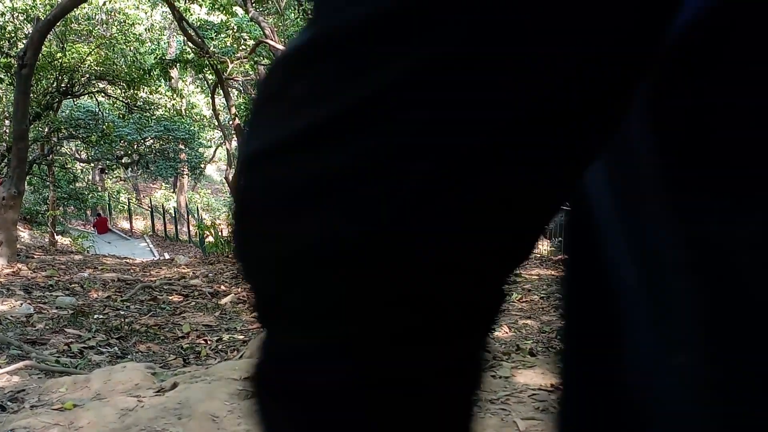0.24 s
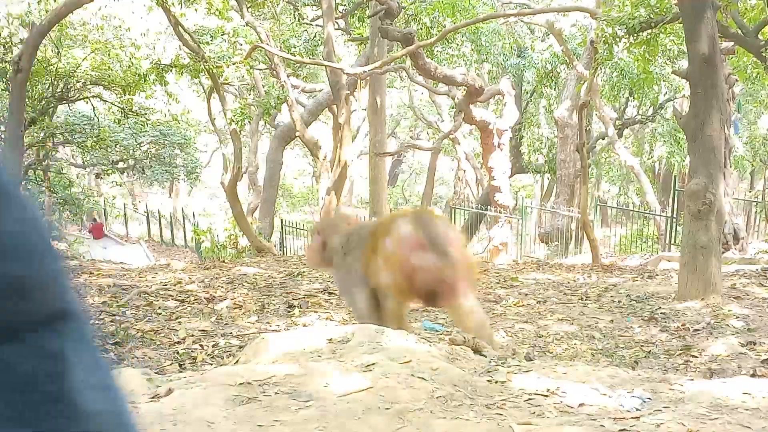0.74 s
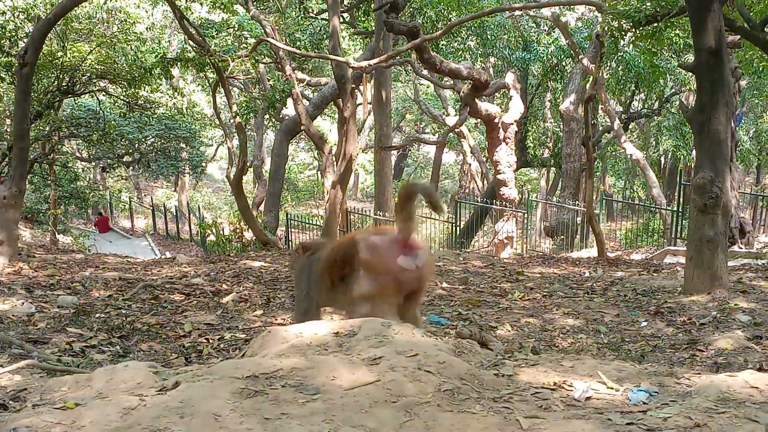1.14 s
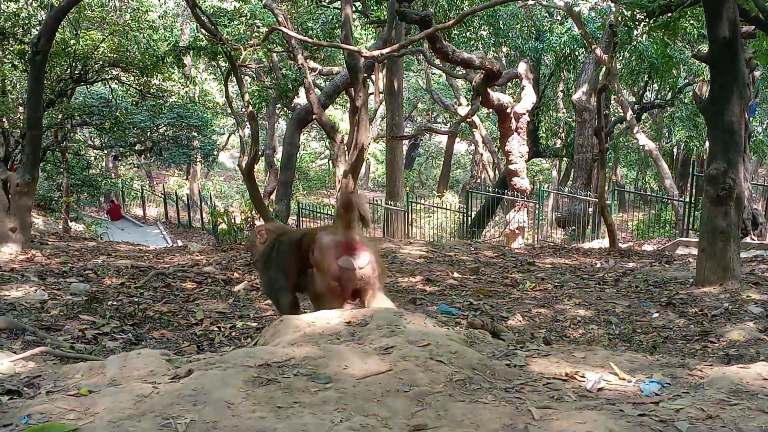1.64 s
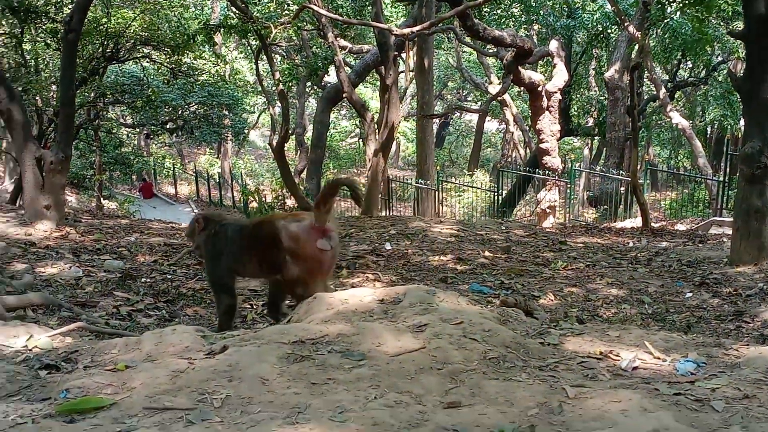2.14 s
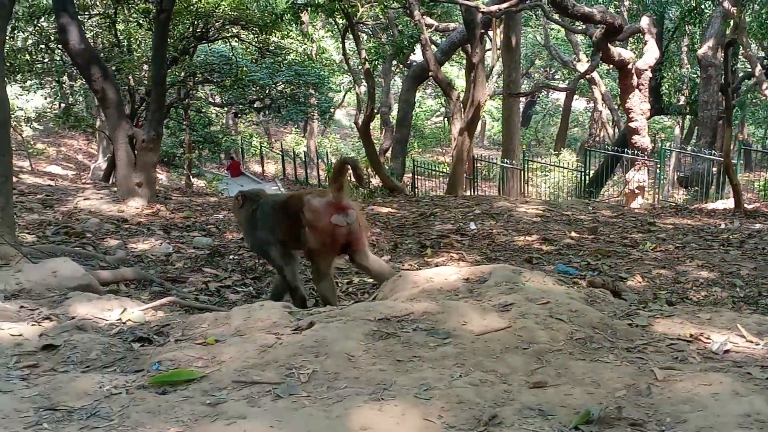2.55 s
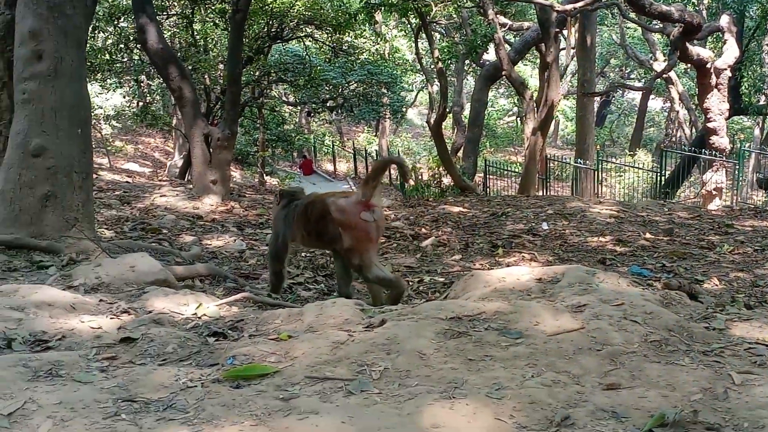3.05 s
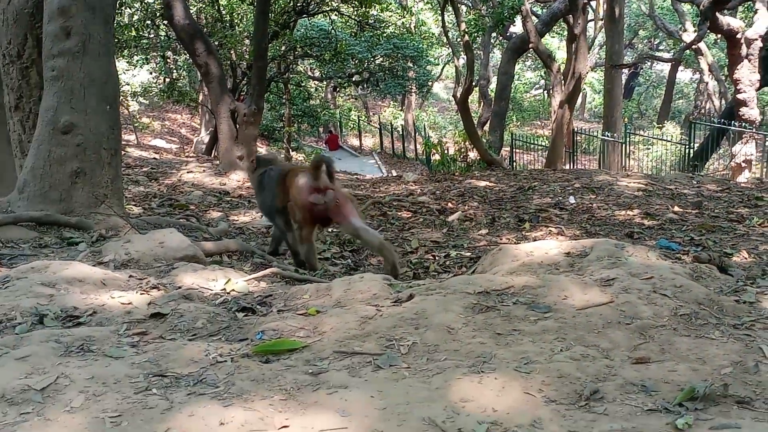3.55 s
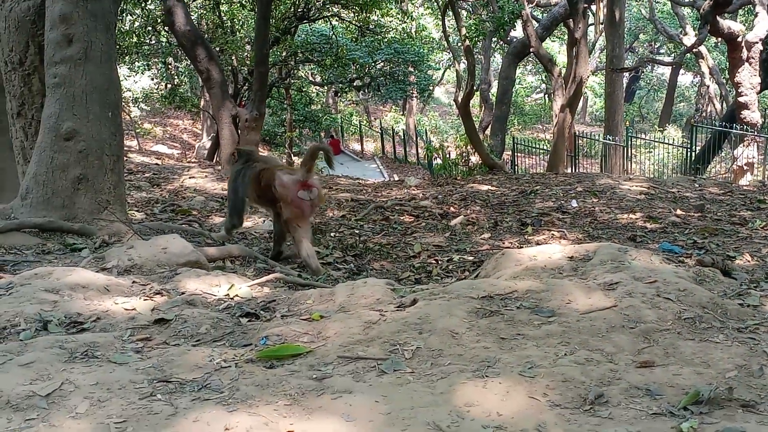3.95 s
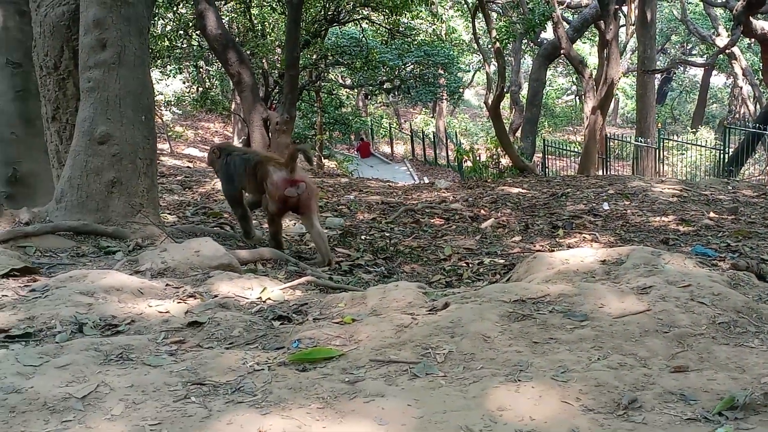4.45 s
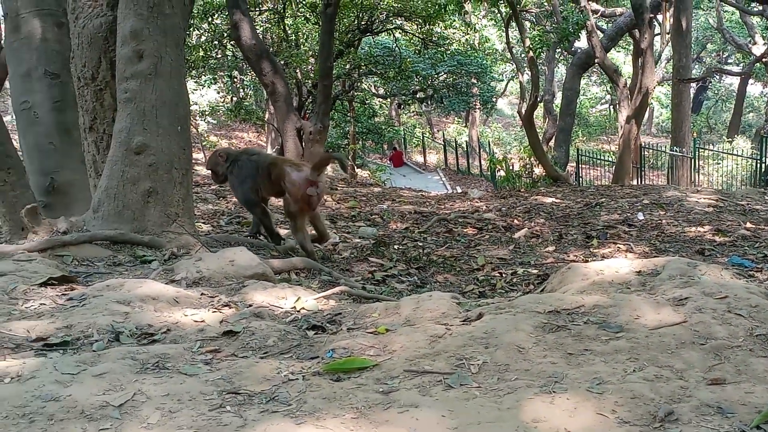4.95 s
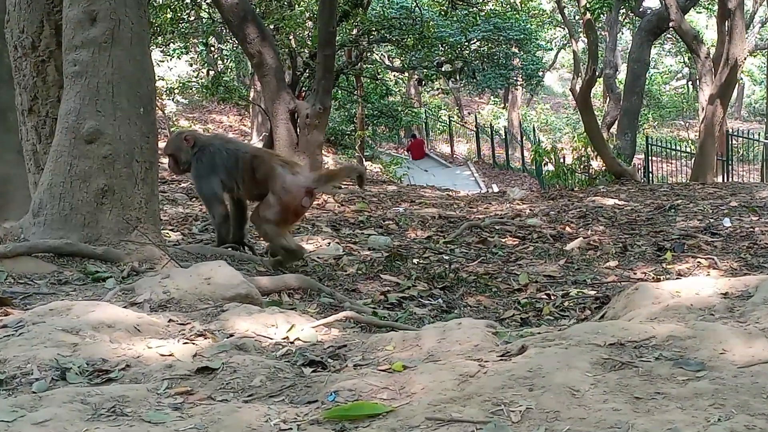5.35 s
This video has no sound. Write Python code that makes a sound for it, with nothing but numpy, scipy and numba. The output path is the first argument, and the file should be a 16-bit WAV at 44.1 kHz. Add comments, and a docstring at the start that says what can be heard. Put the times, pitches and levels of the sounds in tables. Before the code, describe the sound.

Feet and paws crunch through dry leaves close to a hand-held phone, with sharp snaps loudest in the first second. From about 1.5 seconds a bird whistles short falling notes in an even series, each phrase answered by a fainter bird. Distant coos, two soft bumps on the case and a low uneven rumble lie around it, in an open wood with slight echo.

```python
"""Feet and paws crunch through dry leaves close to a hand-held phone, loudest in the first second.
From 1.5 s a bird whistles short falling notes in a wood: a loose opening phrase, then six repeats, each
answered by a fainter bird. Far coos, gliding sines too, join from 2 s; two bumps knock the case at 2.2 and 2.9 s.
The leaves are random clicks ringing in band-passes, the snaps noise bursts; noise rumble lies under it all.
The two ports hear the leaves at different moments; the right one rings near 4 kHz."""
import sys
import numpy as np
from scipy import signal
from scipy.fft import rfft, irfft
from scipy.io import wavfile
from scipy.ndimage import uniform_filter1d
from numba import njit

SR = 44100
rng = np.random.default_rng(int(sys.argv[2]) if len(sys.argv) > 2 else 0)


def file_out(sig):
    """Save sig as 16-bit WAV at sys.argv[1]."""
    # one column per channel
    cols = np.atleast_2d(sig).T
    # limit, then scale
    lim = np.clip(cols, -1, 1)
    pcm = np.round(lim * 32767).astype(np.int16)
    wavfile.write(sys.argv[1], SR, pcm)


N = 246959
LEFT_LEAD_S = .00043  # sound from the ground reaches the left port this much earlier


def undb(db):
    """Decibels to amplitude."""
    return 10 ** (np.asarray(db) / 20)


def unit(x):
    """Scale to rms 1."""
    return x / np.sqrt(np.mean(x ** 2))


def curves(table):
    """Columns of a table joined by straight lines over time, one value a sample."""
    s, *columns = np.transpose(table)
    return [np.interp(np.arange(N) / SR, s, c) for c in columns]


def colour(x, points):
    """Causal filter through (frequency [Hz], gain [dB]) points, built from the cepstrum of the log gain."""
    hz, db = np.transpose(points)
    size = 2 ** 13
    grid = np.maximum(np.arange(size // 2 + 1) * SR / size, 1)
    log_gain = np.interp(np.log(grid), np.log(hz), db) * np.log(10) / 20
    # folding the cepstrum onto positive time gives minimum phase
    cepstrum = irfft(log_gain)
    cepstrum[1:size // 2] *= 2
    cepstrum[size // 2 + 1:] = 0
    impulse = irfft(np.exp(rfft(cepstrum)))
    return signal.fftconvolve(np.atleast_2d(x), impulse[None], axes=1)[:, :N]


@njit
def svf(x, hz, width):
    """State-variable band-pass with moving centre and width, gain 1 at the centre."""
    y, b, l = np.empty(len(x)), 0., 0.  # b, l: band and low states
    for i in range(len(x)):
        g, k = np.tan(np.pi * hz[i] / SR), width[i] / hz[i]
        v = (b + g * (x[i] - l)) / (1 + g * (g + k))
        b, l, y[i] = 2 * v - b, l + 2 * g * v, k * v
    return y


def band(x, hz, width):
    """Band-pass with fixed centre and width in Hz."""
    return svf(x, np.full(len(x), 1. * hz), np.full(len(x), 1. * width))


def walk(rate):
    """Random levels held 1 / rate s and slewed twice; rms 1."""
    hold = int(SR / rate)
    steps = np.repeat(rng.standard_normal(N // hold + 1), hold)
    return unit(uniform_filter1d(uniform_filter1d(steps, hold), hold)[:N])


def add(out, sound, s):
    """Mix a short sound in at time s."""
    i = int(s * SR)
    out[..., i:i + sound.shape[-1]] += sound[..., :max(N - i, 0)]


def panned(sound, pan_db):
    """Two channels set apart by left minus right dB, their mean gain kept at 1."""
    gain = undb(np.array([[pan_db], [-pan_db]]) / 2)
    return sound * gain / gain.mean()


def birds():
    """Near phrase coloured by each ear of the phone, far answer and coos; all echo among the trunks."""
    # whistled notes: (start [s], level before colouring [dB], top [Hz], bottom [Hz], length [s])
    opening_notes = [(1.535, -51, 1175, 836, 0.029), (1.61, -48.5, 1171, 784, 0.026),
                     (1.688, -46.5, 1150, 886, 0.027)]
    opening_answers = [(1.838, -52.5, 920, 770, 0.022), (1.897, -61, 956, 800, 0.025),
                       (1.973, -57, 1007, 830, .028), (2.051, -60.5, 1003, 865, 0.025),
                       (2.167, -57.5, 842, 760, 0.025)]
    # notes of one repeat, near bird and fainter answer, before each repeat's stretch and level:
    # (time after its start [s], level [dB], top [Hz], bottom [Hz], length [s])
    phrase_notes = [(.003, -46.5, 1320, 760, .034), (.069, -46, 1141, 820, 0.0287),
                    (.148, -41, 1150, 847, .024)]
    answer_notes = [(.282, -58.5, 1274, 1180, 0.025), (.297, -53, 958, 789, .028),
                    (.360, -54, 970, 790, .03), (.432, -52.5, 1010, 820, .032), (.56, -56, 850, 750, 0.036)]
    # faint falling tones of birds further off, the low ones likely a dove:
    # (start [s], level [dB], top [Hz], bottom [Hz], length [s], left minus right [dB])
    coo_notes = [(1.98, -57, 562, 499.6, 0.127, 5), (2.78, -77, 2480, 2400, .07, 0),
                 (3.53, -78, 2600, 2500, .06, 0), (3.89, -74, 2450, 2380, .06, 0),
                 (2.915, -65.5, 716, 664, 0.19, -10.5), (3.26, -67, 843, 750, 0.063, -6),
                 (3.376, -64, 742, 676, 0.15, -12.5), (3.492, -71, 689, 670, 0.08, -10),
                 (3.749, -58, 804, 770, 0.063, -15), (3.874, -64.5, 740, 671, 0.12, -10),
                 (5.10, -60, 261, 241, .15, -4), (5.473, -68, 714, 672, .12, 2)]
    # resonances colouring the near bird, left ear then right: (centre [Hz], width [Hz], gain [dB])
    ear_modes = [
        [(1116, 75, 2), (1197, 180, -5.5), (990, 900, -10)],
        [(884, 113, 6.5), (1312, 220, 1), (1167, 300, -6), (1010, 1100, -19)],
    ]

    near, far = np.zeros(N), np.zeros((2, N))
    for s, *note in opening_notes + phrases(phrase_notes):
        add(near, whistle(*note), s)
    for s, *note in opening_answers + phrases(answer_notes):
        add(far, panned(whistle(*note, bend=1.03), -2.8), s)
    for s, *note, pan_db in coo_notes:
        add(far, panned(whistle(*note, skew=0.73, bend=0.85), pan_db), s)
    far = far * undb(3.3 * walk(70))  # moving leaves make distant tones flutter
    ears = [sum(undb(db) * band(near, hz, width) for hz, width, db in modes) for modes in ear_modes]
    direct = undb(2.0) * np.array(ears) + far
    # separate scatter for each ear
    return np.array([signal.fftconvolve(x, tail(t60_s=0.38, db=-2.5, gap_s=0.0073))[:N] for x in direct])


def phrases(template):
    """Notes of every repeat of a template; stretch spaces the notes but leaves their lengths."""
    # repeats of the phrase: (start [s], level offset [dB], stretch of the timing [ratio])
    repeats = [(2.236, -4.5, 1.03), (2.888, -3.5, 1.01), (3.537, -2.5, 1.005), (4.186, -1.7, 1),
               (4.841, -1.3, 1.025), (5.503, -0.9, 1.07)]
    return [(s + at * stretch, db + rel_db, *shape)
            for s, db, stretch in repeats
            for at, rel_db, *shape in template]


def whistle(db, top_hz, bottom_hz, length_s, skew=0.82, bend=1.545):
    """A sine sliding down under a rounded envelope, with a faint octave; bend above 1 delays the slide."""
    u = np.arange(int(length_s * SR)) / (length_s * SR)
    pitch_hz = top_hz + (bottom_hz - top_hz) * u ** bend
    phase = 2 * np.pi * np.cumsum(pitch_hz) / SR
    envelope = np.sin(np.pi * u ** skew) ** 0.98
    return undb(db) * envelope * (np.sin(phase) + undb(-26.5) * np.sin(2 * phase))


def tail(t60_s, db, gap_s):
    """Direct sound plus scattered single echoes that fade; db is the echoes' total level."""
    t = np.arange(int(SR / 2)) / SR
    scatter = rng.standard_normal(len(t)) * (rng.random(len(t)) < .2) * undb(-60 * t / t60_s) * (t > gap_s)
    scatter *= undb(db) / np.sqrt(np.sum(scatter ** 2))
    scatter[0] = 1
    return scatter


def leaves():
    """Crisp crackle, a duller crunch when more weight lands, and the fine hiss of dry edges."""
    # rings of the litter, each fed by shared and own breaking cells:
    # (centre [Hz], width [Hz], relative level [dB])
    crisp_rings = [(2880, 1100, -9), (3280, 780, -4), (3940, 930, -.5), (4510, 630, -4.5),
                   (5370, 840, -3.5)]
    dull_rings = [(657, 380, -6.5), (1100, 600, 0), (1740, 820, 0.5), (2210, 900, -4.5)]
    fine_rings = [(5970, 1500, 2.5), (7730, 3700, 4.5), (10500, 2200, 5.5), (14600, 3000, 2.5)]

    crisp_gain, dull_gain, fine_gain = pressure()
    # in each pair the second crackle is heard by the left port alone
    crisp = ports(crackle(crisp_rings, 2000, 2.8, 3.0), 1.0 * crackle(crisp_rings, 2600, 4.0, 2.7), -2.4)
    dull = ports(crackle(dull_rings, 1300, 2.8, 3.0), 1.1 * crackle(dull_rings, 1500, 1.9, 3.0), -3.5)
    fine = ports(crackle(fine_rings, 3000, 2.8, 5.0), 1.4 * crackle(fine_rings, 2700, 2.8, 3.9), 3.1)
    return crisp_gain * crisp + dull_gain * dull + fine_gain * fine


def pressure():
    """Crisp, dull and fine gains: every step swells and fades at its own pace over a faint stirring."""
    # feet and paws pressing the litter: (peak time [s], crisp level [dB], dull level [dB],
    # fine treble level [dB], time to swell 20 dB [s], time to fade 20 dB [s])
    footfalls = [(0.06, -54, -56, -62, .2, .3), (0.194, -49, -43, -43, .015, .06),
                 (0.355, -51, -53, -50, .06, .12), (0.449, -42, -42, -45, .1, .11),
                 (0.655, -45, -54, -66, .25, .12), (0.82, -60, -62, -66, .08, .1),
                 (0.876, -29, -58, -28, .004, .08), (0.905, -35, -40, -37, .03, .07),
                 (0.994, -43, -49, -58, .1, .1), (1.18, -45, -57, -66, .06, .03),
                 (1.243, -54, -60, -58, .08, .08), (1.385, -44, -50, -48, .045, .08),
                 (1.521, -43, -48, -60, .03, .11), (1.7, -62, -59, -66, .2, .06),
                 (1.89, -63, -74, -74, .07, .3), (2.125, -50, -60, -70, .1, .05),
                 (2.235, -63, -63, -68, .05, .1), (2.409, -68, -70, -67, .05, .15),
                 (2.625, -58, -57, -65, .02, .15), (2.654, -61, -50, -65, .06, .05),
                 (2.77, -53, -69, -68, .05, .025), (2.947, -61, -69, -64, .06, .5),
                 (3.177, -53, -52, -51, .15, .07), (3.279, -58, -76, -60, .15, .04),
                 (3.346, -64, -85, -72, .04, .2), (3.635, -49, -52, -56, .03, .1),
                 (3.785, -54, -80, -59, .25, .09), (4.061, -62, -85, -69, .02, .4),
                 (4.194, -68, -62, -68, .12, .08), (4.326, -58, -71, -62, .15, .08),
                 (4.484, -58, -78, -65, .03, .065), (4.596, -45, -52, -43, .025, .12),
                 (4.865, -61, -74, -80, .15, .09), (4.995, -54, -68, -52, .02, .2),
                 (5.232, -62, -76, -58, .2, .15), (5.37, -63, -76, -68, .15, .1),
                 (5.54, -64, -65, -65, .08, .3)]
    # litter stirring between steps: (crisp level [dB], dull level [dB], fine level [dB])
    stir_db = (-78, -80, -74)

    t, power = np.arange(N) / SR, undb(stir_db)[:, None] ** 2
    for s, *db, swell_s, fade_s in footfalls:
        shape = undb(-20 * np.maximum((s - t) / swell_s, (t - s) / fade_s))
        power = power + (undb(db)[:, None] * shape) ** 2
    return np.sqrt(power)


def crackle(rings, rate, spread_db, drift_db):
    """Clicks shared by all rings plus clicks of each ring's own; clumps and colour drift."""
    shared = grains(rate, spread_db)
    total = np.zeros(N)
    for hz, width, db in rings:
        drift = drift_db * (walk(30) + 0.35 * walk(9))
        clicks = shared + grains(rate, spread_db)
        ring = unit(band(band(clicks, hz, width), hz, 1.5 * width))
        total += undb(db + drift) * ring
    return unit(total * undb(3.3 * walk(110)))


def grains(rate, spread_db):
    """Breaking leaf cells: random clicks, rate a second on average, most tiny and a few large."""
    when, size = rng.random((N, 2)).T
    loudness = undb(-spread_db * np.log(1 - size))
    return unit((when < rate / SR) * loudness * rng.standard_normal(N))


def ports(x, own, left_db):
    """Ground sound reaches the left port first, mixed with what only it hears; the right port rings."""
    # the grip shifts the ring of the right port: (time [s], centre [Hz], width [Hz])
    ring_path = [(0, 3750, 604), (2.7, 3700, 701), (3.0, 4600, 1515), (3.6, 4200, 1295), (4.5, 4600, 1450),
                 (5.6, 4400, 1542)]
    right = np.roll(x, int(LEFT_LEAD_S * SR))
    ring = undb(13) * svf(right, *curves(ring_path))
    both = np.array([undb(left_db) * unit(x + own), right + ring])
    return both / both.mean(axis=0).std()


def snaps():
    """Each snap is a short burst ringing briefly at its own pitch, with a lower knock and a noisy tail."""
    # loudest snaps of leaves and twigs, before the trims below: (time at the right port [s], peak level [dB],
    # nominal centre [Hz], left minus right [dB], knock relative to peak [dB], burst decay [s])
    snap_events = [(0.0607, -33, 2920, -12, -21, 0.0008), (0.1124, -20.5, 4200, 0, -41, 0.0021),
                   (0.186, -22, 3010, -11, -11, 0.0005), (0.2591, -38, 3960, -14, -36, 0.0011),
                   (0.3436, -33, 3570, -25, -13, 0.0023), (0.395, -19.5, 3380, -11, -10.5, 0.0009),
                   (0.4191, -6, 3630, -12, -10, 0.0012), (0.4419, -21, 3900, -7, -6, 0.0012),
                   (0.4826, -23, 3630, -7, -13, 0.0007), (0.633, -41, 3750, -10, 2, 0.0005),
                   (0.817, -42, 3230, -20, -12, 0.0004), (0.873, -32, 3420, -14, -42, 0.001),
                   (0.879, -25, 3670, -14, -30, 0.0006), (0.9046, -14, 3860, -3.5, -35, 0.001),
                   (0.9308, -24, 3860, -18, -35, 0.0009), (0.9877, -33, 3570, -15, -25, 0.0014),
                   (1.0828, -20.5, 3710, -13, -51, 0.0015), (1.1464, -41, 3800, -10, -12, 0.0009),
                   (1.2102, -39, 3250, -10, -30, 0.0009), (1.2482, -39, 3030, -10, -28, 0.0008),
                   (1.355, -34, 3880, -5, -23, 0.0007), (1.3853, -24.5, 2480, -9, -35, 0.0008),
                   (1.479, -41, 3450, -13, -23, 0.0009), (1.511, -23, 2400, -17, -20.5, 0.0026),
                   (1.525, -22, 3070, 3, -40, 0.0005), (1.6155, -40, 3800, -12, -11, 0.0009),
                   (2.0802, -35, 3700, -10, -35, 0.0007), (2.1125, -29, 2240, -8, -36, 0.0005),
                   (2.165, -35, 3660, -1.5, -31, 0.0022), (2.4028, -45, 4030, -3.5, -5, 0.0016),
                   (2.6193, -39, 3960, -3, -17, 0.0013), (2.652, -35, 1960, 1, -5, 0.0008),
                   (2.944, -42, 4540, -12, -11, 0.0009), (3.1643, -32, 1900, -2, -20, 0.0013),
                   (3.1858, -16.5, 5080, -20, -26, 0.0018), (3.612, -39, 4170, -16, -7, 0.0011),
                   (3.6237, -38, 4300, -16, -4, 0.0015), (4.0535, -46.5, 4080, -10, -19.5, 0.0011),
                   (4.2455, -39.5, 5340, -13, -12, 0.0009), (4.3163, -40.5, 4460, -21, -12, 0.0009),
                   (4.5846, -27.5, 5770, -20, -24, 0.0011), (4.9866, -43.5, 4650, -12, -9, 0.0012),
                   (5.2255, -44, 4570, -18, -17, 0.0016), (5.534, -48.5, 2260, -4, 0, 0.0009)]
    out, t = np.zeros((2, N)), np.arange(int(.04 * SR)) / SR
    for s, db, hz, pan_db, low_db, burst_s in snap_events:
        envelope = np.exp(-t / burst_s) + .09 * np.exp(-t / .008)
        burst = rng.standard_normal((2, len(t))) * envelope
        burst[1] = 0.82 * burst[0] + 1.32 * burst[1]  # the ports share part of the noise
        burst[:, 0] += 2.5  # sharp first click
        left = band(band(burst[0], 1.34 * hz, 1.6 * hz), 0.94 * hz, 0.88 * hz)
        right = band(band(burst[1], hz, 0.16 * hz), hz, 1.1 * hz) + 0.16 * band(burst[1], hz, 1.5 * hz)
        knock = band(band(burst[0], 1000, 1000), 1000, 1300)
        crack = panned(np.array([left / abs(left).max(), right / abs(right).max()]), pan_db)
        add(out[0], undb(db + 3.5) * crack[0], s - LEFT_LEAD_S)
        add(out[1], undb(db + 0.73) * crack[1], s)
        add(out, undb(db + low_db - 1) * panned(knock / abs(knock).max(), -3.5), s)
    return out


def bumps():
    """A knock on the case: a cycle and a half of low thump, mostly in one port."""
    # bumps on the case: (start [s], peak level [dB], nominal pitch [Hz], left minus right [dB])
    case_knocks = [(2.232, -26, 216, -38), (2.913, -37, 200, -25)]
    out, t = np.zeros((2, N)), np.arange(int(.03 * SR)) / SR
    for s, db, hz, pan_db in case_knocks:
        envelope = np.exp(-((t - .007) * hz / 0.46) ** 2)
        swing = envelope * np.cos(2 * np.pi * 1.08 * hz * (t - .0075))
        add(out, panned(undb(db) * swing, pan_db), s)
    return out


def ground():
    """Noise rumble nearly alike in both ports, throbbing; a wide murmur above it; faint air in the ports."""
    # rumble before its throb: (time [s], level [dB], level of the deep part [dB])
    rumble_path = [(0, -56, -60), (.3, -53, -57), (.58, -51, -55), (.72, -60, -66), (.82, -53, -57),
                   (1.3, -57, -62), (1.53, -56, -59), (1.85, -63, -74), (1.98, -57, -57), (2.3, -58, -62),
                   (2.71, -62, -70), (2.98, -55, -61), (3.4, -68, -78), (3.49, -60, -68), (3.88, -68, -80),
                   (4.2, -63, -80), (4.63, -58, -74), (5.0, -62, -78), (5.6, -65, -76)]
    # spectrum of the rumble: (frequency [Hz], relative gain [dB])
    rumble_tone = [(50, -28), (85, -3), (130, -1.5), (226, -11), (255, -17), (338, -20.5), (377, -22),
                   (500, -28), (650, -62), (1100, -120)]
    # murmur of the wood in the low middle: (time [s], level [dB])
    wood_path = [(0, -61), (.5, -65), (1.1, -61), (1.7, -66), (2.2, -64), (2.7, -68), (3.7, -67),
                 (4.1, -70), (5.6, -68)]

    rumble_db, deep_db = curves(rumble_path)
    mid, side = colour(rng.standard_normal((2, N)), rumble_tone)
    deep, deep_side = (band(band(band(w, 68, 36), 68, 40), 68, 44) for w in rng.standard_normal((2, N)))
    rumble = unit(mid) * undb(rumble_db + 3.3 * walk(18)) + unit(deep) * undb(deep_db + 3.5 * walk(9))
    # a weaker part of opposite sign in the two ports
    apart = unit(side) * undb(rumble_db - 13.5) + unit(deep_side) * undb(deep_db - 12)
    rumble = rumble + apart * np.array([[1], [-1]])

    *wide, common = rng.standard_normal((3, N))
    murmur = []
    for own in wide:
        wavering = band(own + 1.3 * common, 620, 500) * undb(5.3 * walk(13))
        murmur.append(unit(band(wavering, 640, 700)))

    airs = [band(rng.standard_normal(N), 2500, 5700) * undb(3.6 * walk(9)) for _ in range(2)]
    air = ports(*airs, left_db=-2.5)
    return rumble + undb(curves(wood_path)[0]) * np.array(murmur) + undb(-79.5) * air


def scene():
    """Bird calls, leaf crunch, snaps and case bumps over the ground bed."""
    return birds() + leaves() + snaps() + bumps() + ground()


def record(dry):
    """Dull microphones, a trace of circuit hiss and a steep top cut."""
    # treble roll-off of the microphones: (frequency [Hz], gain [dB])
    mic_response = [(20, 3), (4000, 0.5), (5500, -4.5), (6500, -9.5), (7500, -20), (9000, -30.5),
                    (11000, -42), (13000, -44.5), (15200, -36)]
    hiss_db, top_hz = -99.5, 15700  # hiss level ahead of the top cut
    sound = colour(dry, mic_response) + undb(hiss_db) * rng.standard_normal(dry.shape)
    return signal.sosfilt(signal.ellip(8, .2, 40, top_hz, fs=SR, output="sos"), sound)


dry = scene()
out = record(dry)
file_out(out)
```